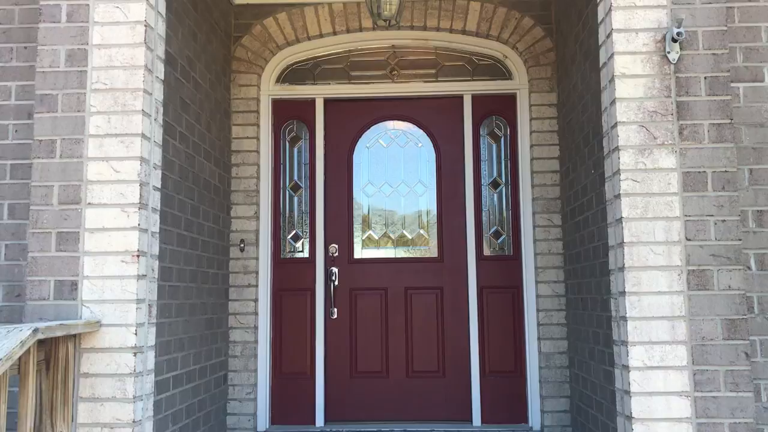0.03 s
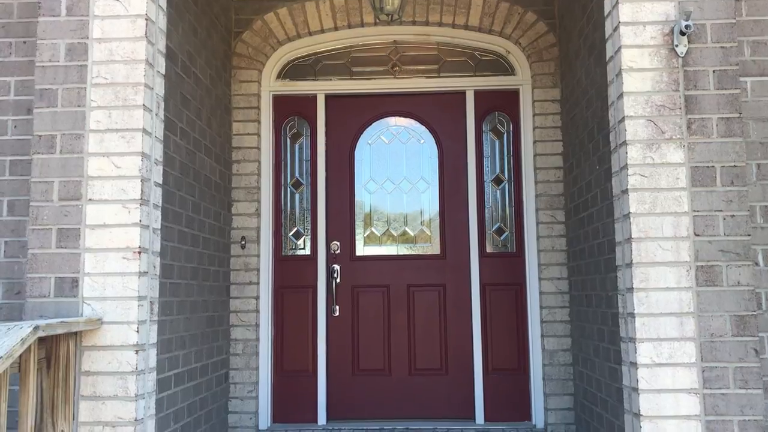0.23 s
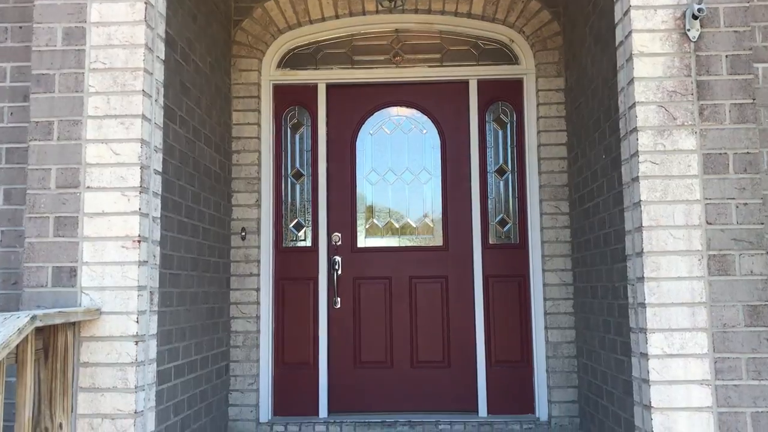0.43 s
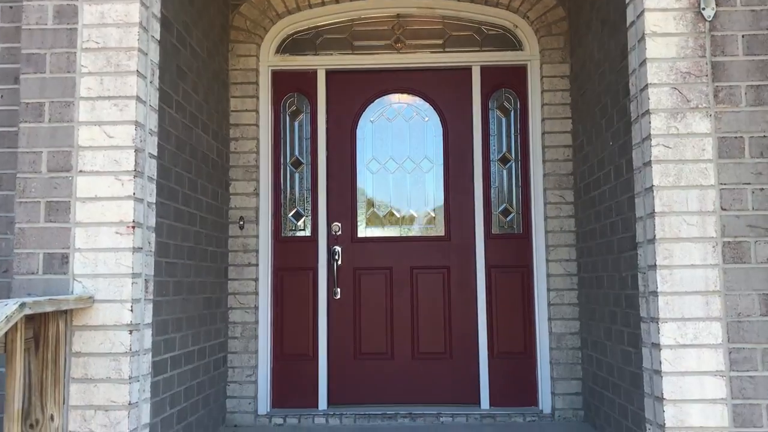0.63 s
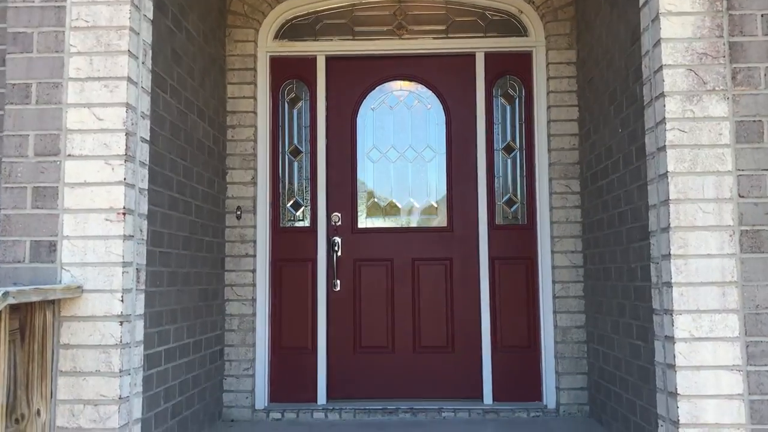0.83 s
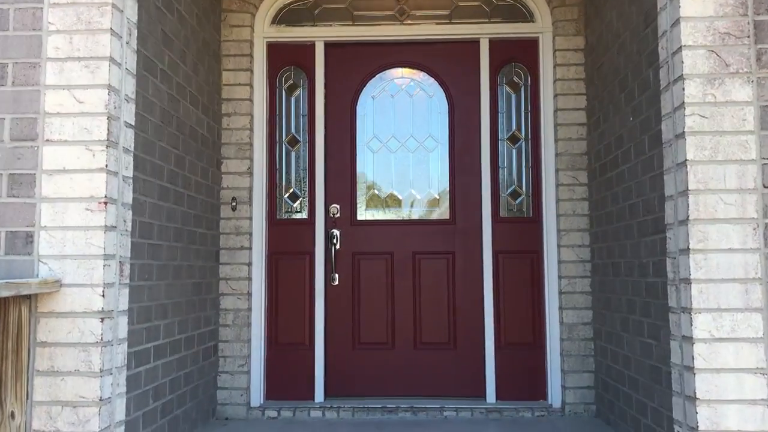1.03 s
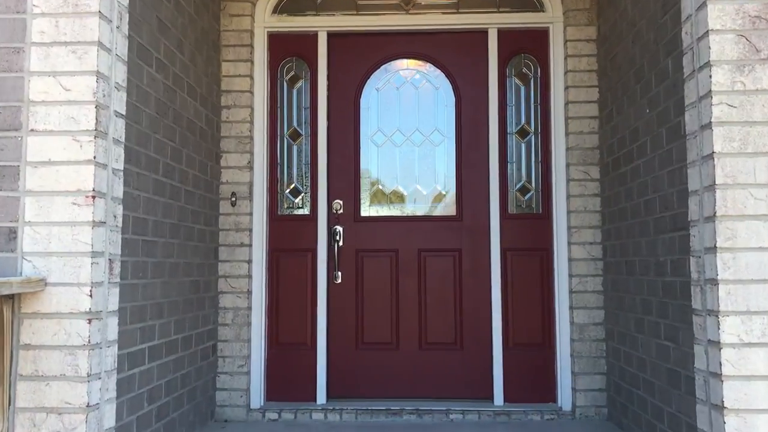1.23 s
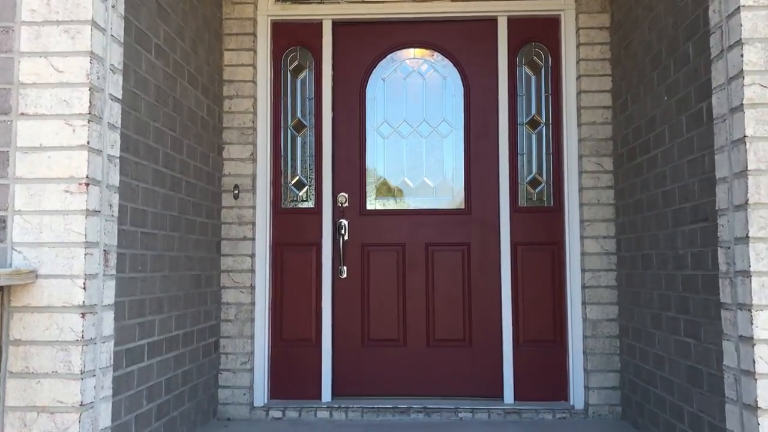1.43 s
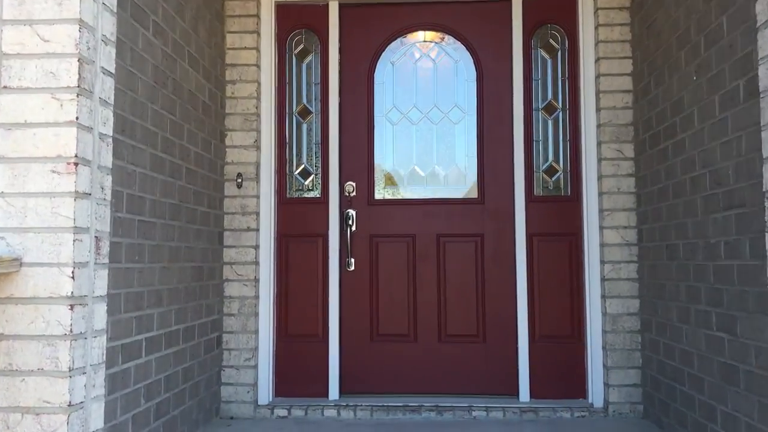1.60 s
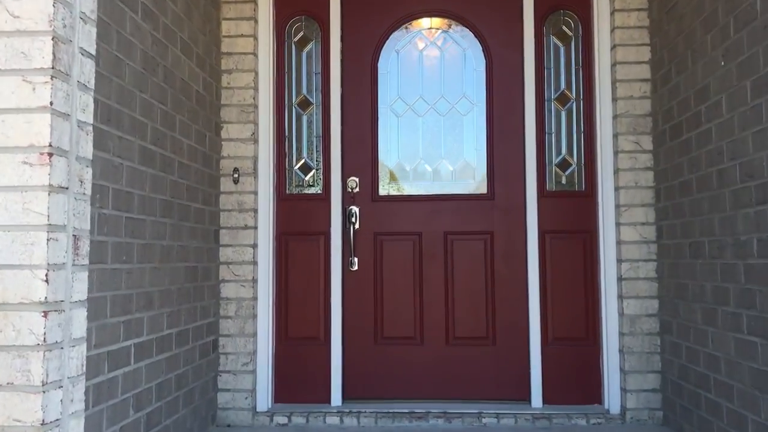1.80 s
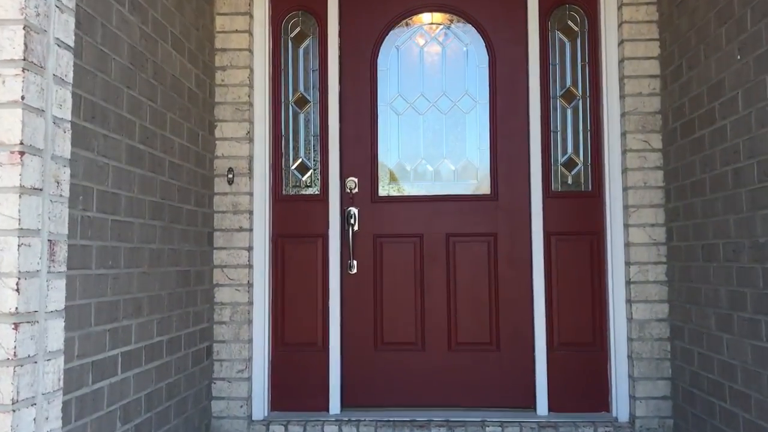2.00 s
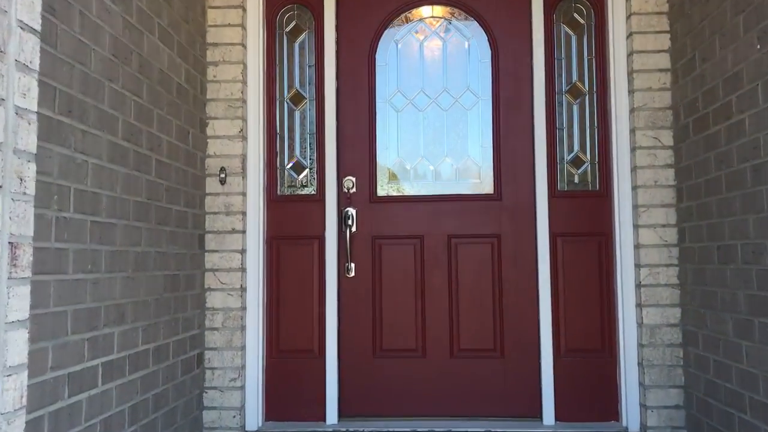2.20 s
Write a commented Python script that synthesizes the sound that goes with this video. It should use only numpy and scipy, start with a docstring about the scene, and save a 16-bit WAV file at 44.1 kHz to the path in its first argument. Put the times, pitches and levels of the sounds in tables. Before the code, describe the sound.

A breeze buffets the microphone over faint scuffing steps and quiet outdoor air.

```python
"""Breeze at a brick porch

Someone walks slowly up to a porch with a camera on a quiet day. Turbulent air presses on the
microphone as a low rumble, and eddies buffet it in two gusts. Over a soft outdoor wash, friction
makes clothes rustle and soles scuff faintly on the paving. One small tap rings in the porch."""
import sys
import numpy as np
from scipy import signal
from scipy.fft import rfft, irfft
from scipy.io import wavfile
from scipy.ndimage import uniform_filter1d

SR = 44100
rng = np.random.default_rng(int(sys.argv[2]) if len(sys.argv) > 2 else 0)


def transcribe(u):
    """Save the signal u as a 16-bit wav file named by the first command-line argument.

    u: samples, shape (n,) or (channels, n), limited to [-1, 1]; the rate is SR.
    q: integer samples, one column per channel.
    """
    v = np.clip(np.atleast_2d(u).T, -1, 1)
    q = np.round(v * 32767).astype(np.int16)
    wavfile.write(sys.argv[1], SR, q)


N = 103635
T = np.arange(N) / SR
HZ = np.fft.rfftfreq(N, 1 / SR) + 1


def amp(db):
    """Amplitude ratio of a level in decibels."""
    return 10 ** (np.asarray(db) / 20)


def unit(x):
    """Normalisation to rms 1."""
    return x / np.sqrt(np.mean(x ** 2) + 1e-20)


def envelope(points):
    """Gain over time, interpolated between (s, dB) points."""
    return amp(np.interp(T, *np.transpose(points)))


def swell(time_s, length_s):
    """Gaussian envelope centred on time_s."""
    return np.exp(-np.minimum(2 * ((T - time_s) / length_s) ** 2, 50))


def spectrum(points):
    """Gain over log frequency, interpolated between (Hz, dB) points."""
    hz, db = np.transpose(points)
    return amp(np.interp(np.log(HZ), np.log(hz), db))


def band(centre_hz, octaves):
    """Gaussian passband over log frequency."""
    return np.exp(-.5 * (np.log2(HZ / centre_hz) / octaves) ** 2)


def filtered(x, gain):
    """Filtering by multiplication of the spectrum, at rms 1."""
    return unit(irfft(rfft(x) * gain, N))


def noise(gain):
    """Gaussian noise coloured by a gain per frequency, at rms 1."""
    return filtered(rng.standard_normal(N), gain)


# Each row: frequency in Hz, relative spectral density in dB.
WASH_SPECTRUM = [(20, -9.5), (70, 7.5), (150, -2.5), (300, -2), (500, -3), (800, -7), (1200, -10),
                 (1800, -15.5), (2500, -17.5), (3800, -22), (4900, -26.5), (6200, -26), (7600, -30.5),
                 (9000, -28), (10400, -35), (11200, -29.5), (15500, -33.5)]
# Each row: time in seconds, level in dB.
WASH_ENVELOPE = [(0, -59.5), (.7, -60), (1.3, -59), (1.8, -59.5), (2.35, -60)]
def outdoor_wash(depth_db=1.45):
    """Random modulation: distant noise drifts faintly in patches of time and frequency."""
    frames = dict(nperseg=1024, noverlap=768)
    spectrogram = signal.stft(noise(spectrum(WASH_SPECTRUM)), **frames)[2]
    patches = uniform_filter1d(rng.standard_normal(spectrogram.shape), size=10, axis=0)
    patches = unit(uniform_filter1d(patches, size=12, axis=1))
    drifting = signal.istft(spectrogram * amp(depth_db * patches), **frames)[1][:N]
    return envelope(WASH_ENVELOPE) * unit(drifting)


# Each row: frequency in Hz, relative spectral density in dB.
HOLLOW_SPECTRUM = [(40, -22), (140, 6.5), (240, -6.5), (350, -5.5), (560, -9), (800, -14), (2000, -34)]
# Each row: time in seconds, level in dB.
HOLLOW_ENVELOPE = [(0, -70), (1.2, -70), (1.7, -62), (2.35, -63.5)]
def porch_hollow():
    """Reverberant build-up: low outdoor noise gathers between the brick walls as the porch nears."""
    return envelope(HOLLOW_ENVELOPE) * noise(spectrum(HOLLOW_SPECTRUM))


def friction(bursts_per_s=720, decay_s=.00074, power_share=.54):
    """Shot noise of rubbing: tiny decaying bursts at random moments in a fine hiss."""
    impulses = 1. * (rng.random(N) < bursts_per_s / SR)
    bursts = signal.lfilter([1], [1, -np.exp(-1 / (decay_s * SR))], impulses)
    power = 1 - power_share + power_share * unit(bursts) ** 2
    return rng.standard_normal(N) * np.sqrt(power)


# Each row: frequency in Hz, relative spectral density in dB.
CLOTH_SPECTRUM = [(500, -20), (2000, 12), (4000, 6), (8000, 0.5), (12000, -4.5), (16000, 1.5)]
# Each row: time in seconds, level in dB.
CLOTH_ENVELOPE = [(0, -77), (1.4, -110), (1.6, -72), (1.8, -80), (2.02, -72.5), (2.17, -75), (2.35, -67.5)]
def clothes():
    """Friction of the walker's clothes gives a broadband rustle."""
    return envelope(CLOTH_ENVELOPE) * filtered(friction(), spectrum(CLOTH_SPECTRUM))


# Each row: peak time in seconds, length in seconds, level in dB, centre in Hz, width in octaves.
SCUFF_STROKES = [(0.085, 0.021, -76, 6000, 1.1), (0.472, 0.042, -72, 5970, 0.84),
                 (.855, 0.024, -75, 6000, 1.5), (.86, .012, -64.5, 1100, 0.38),
                 (1.025, 0.02, -74, 3500, 0.66), (1.14, 0.057, -63, 1500, 0.59),
                 (1.164, 0.035, -70.5, 3230, 0.88), (1.259, .012, -61.5, 990, 0.38),
                 (1.397, .02, -69.5, 2900, 0.46), (1.522, 0.035, -70.5, 3580, 0.36),
                 (1.61, 0.027, -70.5, 6000, 0.66), (1.742, 0.016, -73, 11900, .5),
                 (1.841, .02, -53, 345, 0.22), (1.885, .025, -59.5, 276, 0.27),
                 (1.974, 0.03, -66, 1510, 1.2), (1.99, 0.061, -68.5, 5450, 0.86),
                 (1.991, .025, -69, 10900, .15), (2.302, .04, -71, 5500, 0.93)]
def scuffs():
    """Sliding friction of soles on paving and of the hand on the camera gives brief bands of noise."""
    return sum(amp(db) * swell(time_s, length_s) * filtered(friction(), band(hz, octaves))
               for time_s, length_s, db, hz, octaves in SCUFF_STROKES)


# Each row: start in seconds, level in dB, band centre in Hz.
GRIT_CRACKS = [(.073, -66, 5850), (.091, -65, 5470), (.4565, -55, 1570), (.466, -65, 7000),
               (1.608, -57, 5940), (1.625, -70, 7000), (1.9722, -60, 5500), (1.978, -65, 6000),
               (1.979, -64, 8000), (1.992, -56, 4430), (1.9947, -60, 4500)]
def cracking_grit(t60_s=.015):
    """Fracture: each grain cracking underfoot emits a noise burst that decays exponentially."""
    out = np.zeros(N)
    for start_s, db, hz in GRIT_CRACKS:
        decay = (T > start_s) * amp(db - 60 * np.clip((T - start_s) / t60_s, 0, 2))
        out += decay * noise(band(hz, octaves=.78))
    return out


# Each row: peak time in seconds, length in seconds, level in dB, pitch in Hz, glide in Hz per second.
SQUEAK_GLIDES = [(1.162, 0.031, -64, 2470, 4500), (1.3, 0.055, -69, 1550, 0)]
def squeaks(width_hz=98):
    """Line broadening: slow noise modulates a tone into a faint, barely pitched squeak."""
    out = np.zeros(N)
    for time_s, length_s, db, hz, glide in SQUEAK_GLIDES:
        fuzz = noise(1 / (1 + (HZ / width_hz) ** 2))
        cycles = hz * (T - time_s) + .5 * glide * (T - time_s) ** 2
        out += amp(db) * swell(time_s, length_s) * unit(fuzz * np.sin(2 * np.pi * cycles))
    return out


# Each row: mode frequency in Hz, level in dB, time to decay by 60 dB in seconds.
TAP_MODES = [(1100, -44, 0.012), (1450, -49, 0.0077), (2350, -48, 0.0044), (3960, -54, 0.011),
             (6850, -61, 0.0043)]
# Each row: frequency in Hz, relative spectral density of the reverberation in dB.
PORCH_SPECTRUM = [(300, -19), (750, -8), (1150, 5), (1700, -10), (4000, -19), (9000, -24), (16000, -49)]
def tap(start_s=2.2112, tail_db=-58.5, tail_t60_s=.32):
    """Damped modes ring after a small hard knock, and the brick porch reverberates briefly."""
    age = np.maximum(T - start_s, 0)
    knock = sum(amp(db - 60 * age / t60) * np.sin(2 * np.pi * hz * age) for hz, db, t60 in TAP_MODES)
    tail_decay = (age > 0) * amp(tail_db - 60 * age / tail_t60_s)
    return knock + tail_decay * noise(spectrum(PORCH_SPECTRUM))


def turbulence(gain, steadiness):
    """Random pressure fluctuations in a band; steadiness (0-1) compresses their envelope."""
    analytic = signal.hilbert(noise(gain))
    evened = analytic.real / (abs(analytic) + .086) ** steadiness
    passband = np.minimum(gain / gain.max() * 10, 1)
    return filtered(evened, passband)


# Each row: time in seconds, relative level of the wind pressure in dB.
WIND_ENVELOPE = [(.045, -43.5), (.08, -56), (.115, -41.5), (.175, -52), (.22, -40.5), (.28, -47.5),
                 (.305, -41), (.4, -37.5), (.52, -37.5), (.56, -54.5), (.69, -48), (.83, -48.5),
                 (.895, -53), (.95, -41), (1.005, -58), (1.04, -45), (1.07, -53), (1.11, -37), (1.19, -49),
                 (1.23, -43.5), (1.38, -41), (1.415, -58), (1.45, -44.5), (1.48, -59.5), (1.54, -44.5),
                 (1.59, -60), (1.82, -68), (1.9, -44.5), (1.95, -59.5), (2.01, -40.5), (2.08, -42.5),
                 (2.12, -55.5), (2.195, -52), (2.24, -56), (2.35, -56)]
# Each row: frequency in Hz, relative spectral density of the slow flow in dB.
RUMBLE_SPECTRUM = [(10, -46.5), (25, -22.5), (45, -3), (70, 2), (100, -4), (135, -15), (180, -24),
                   (300, -38.5), (1000, -85)]
# Each row: frequency in Hz, relative spectral density added by stronger flow in dB.
FLUTTER_SPECTRUM = [(50, -27), (120, 1), (160, -0.5), (220, -10.5), (330, -30), (600, -46), (1500, -83)]
def wind(rumble_db=-1, flutter_db=-56, flutter_exponent=1.63, steadiness=.82):
    """Turbulent pressure rumbles on the microphone; a higher flutter grows faster, by a power law."""
    pressure = envelope(WIND_ENVELOPE)
    rumble = pressure * turbulence(spectrum(RUMBLE_SPECTRUM), steadiness)
    flutter = unit(pressure ** flutter_exponent) * turbulence(spectrum(FLUTTER_SPECTRUM), steadiness)
    return amp(rumble_db) * rumble + amp(flutter_db) * flutter


# Each row: peak time in seconds, length in seconds, relative level in dB, top of the band in Hz.
GUST_EDDIES = [(.045, 0.014, -49, 168), (.229, .009, -35, 222), (.252, 0.017, -46.5, 260),
               (0.308, 0.015, -39, 223), (.349, 0.0091, -29, 265), (.378, 0.0073, -34.5, 334),
               (.388, 0.0084, -28.5, 277), (.4005, 0.0085, -24.5, 239), (.416, 0.0098, -33, 150),
               (.432, .007, -28.5, 314), (.444, .009, -28, 228), (0.459, 0.01, -34.5, 440),
               (.4805, 0.0093, -26.5, 372), (.497, 0.017, -37.5, 219), (0.52, .014, -43.5, 130),
               (1.025, 0.019, -51, 200), (1.13, .025, -47.5, 170), (1.228, 0.0091, -35.5, 253),
               (1.25, 0.01, -33, 210), (1.296, 0.013, -34, 203), (1.311, 0.018, -41.5, 219),
               (1.334, 0.0093, -39, 310), (1.363, 0.014, -32.5, 228), (1.542, 0.029, -48.5, 212)]
def eddies(core_db=7, core_periods=.44, swirl_db=-3, low_hz=110, port_hz=102):
    """Each vortex passes the microphone port as a low-pressure core wrapped in turbulence."""
    port_bass_cut = signal.butter(N=2, Wn=port_hz, btype="high", fs=SR)
    out = np.zeros(N)
    for time_s, length_s, db, top_hz in GUST_EDDIES:
        core = signal.lfilter(*port_bass_cut, -swell(time_s, core_periods / top_hz))
        passband = 1 / (1 + (low_hz / HZ) ** 2) / (1 + (HZ / top_hz) ** 5.35)
        swirl = swell(time_s, length_s) * turbulence(passband, steadiness=.95)
        out += amp(db) * (amp(core_db) * core + amp(swirl_db) * swirl)
    return out


def scene():
    """Superposition: the pressures of all sources add at one microphone."""
    breeze = wind() + eddies()
    background = outdoor_wash() + porch_hollow()
    walker = clothes() + scuffs() + cracking_grit()
    return (breeze + background + walker + squeaks() + tap())[None]


def record(dry, start_s=.036, rise_s=.002, cutoff_hz=15750):
    """Gating and band limiting: the sound opens after a moment of silence and is low-pass filtered."""
    gate = np.clip((T - start_s) / rise_s, 0, 1)
    lowpass = signal.firwin(511, cutoff_hz, window=("kaiser", 9), fs=SR)
    return signal.oaconvolve(dry * gate, lowpass[None], "same")


dry = scene()
out = record(dry)
transcribe(out)
```